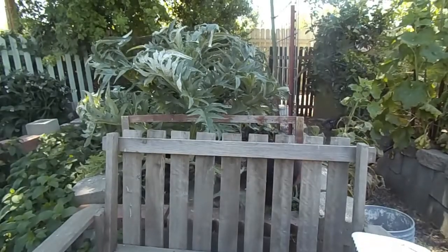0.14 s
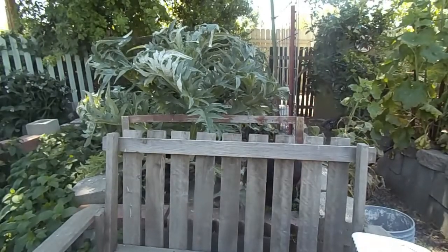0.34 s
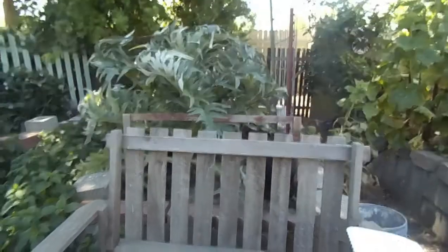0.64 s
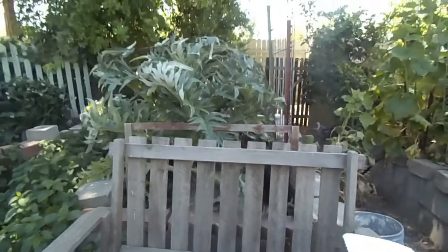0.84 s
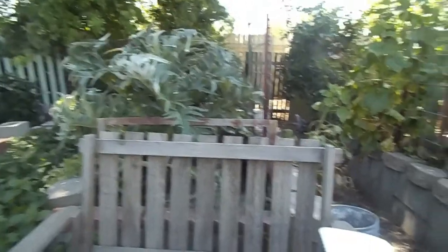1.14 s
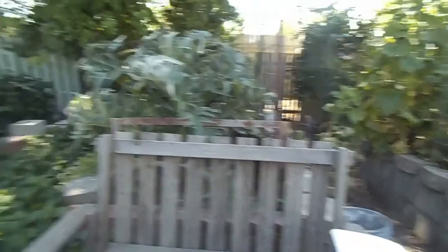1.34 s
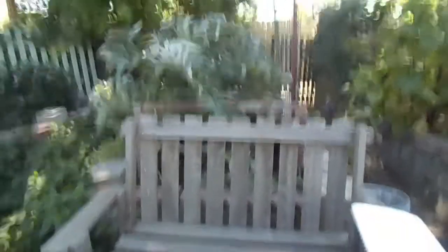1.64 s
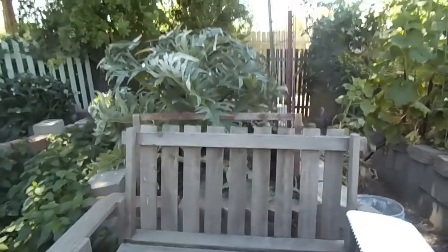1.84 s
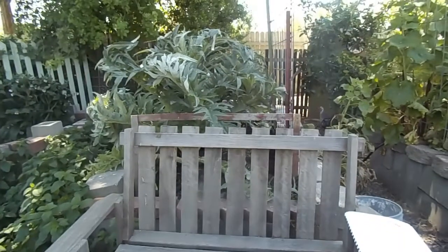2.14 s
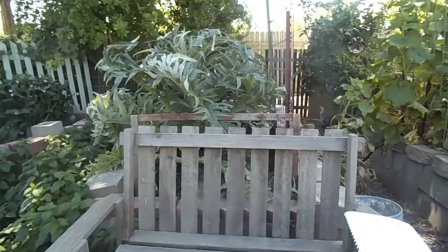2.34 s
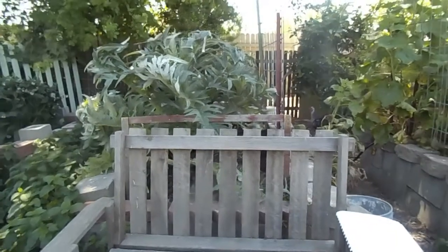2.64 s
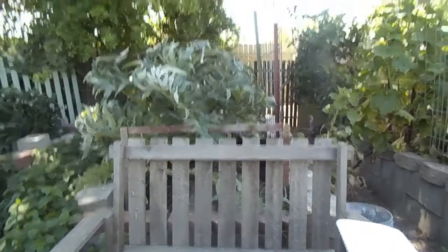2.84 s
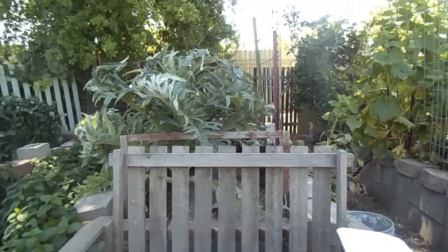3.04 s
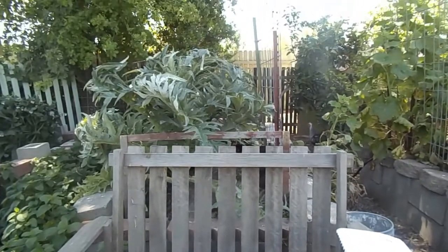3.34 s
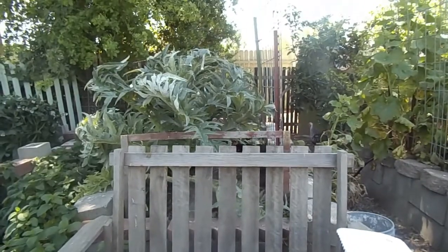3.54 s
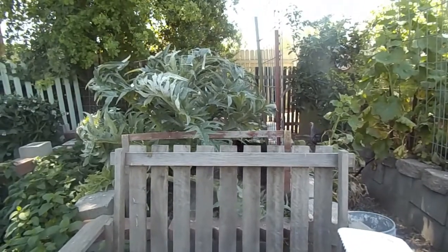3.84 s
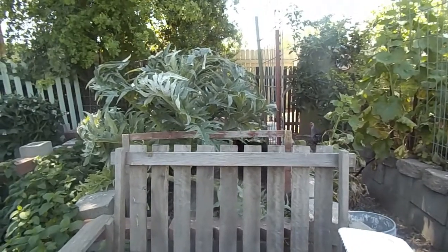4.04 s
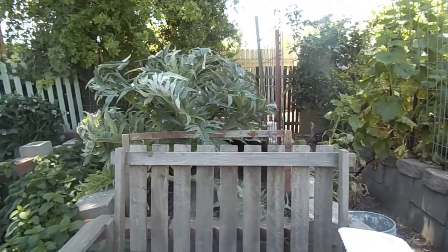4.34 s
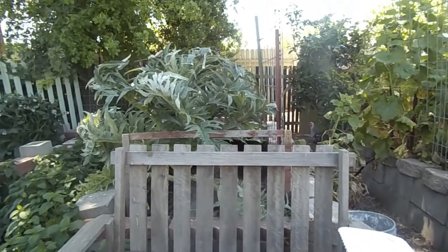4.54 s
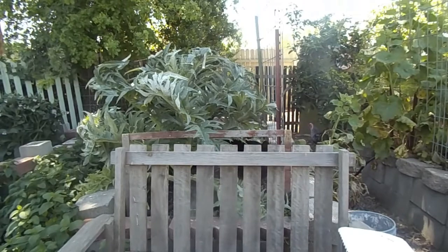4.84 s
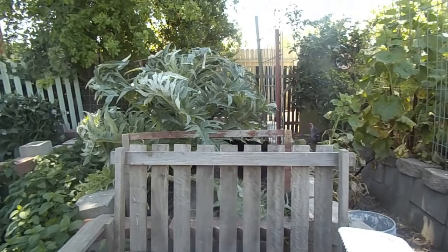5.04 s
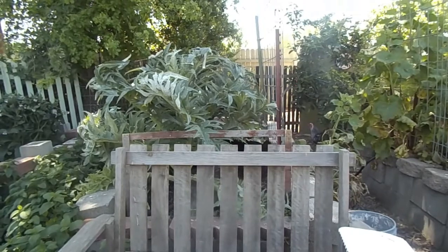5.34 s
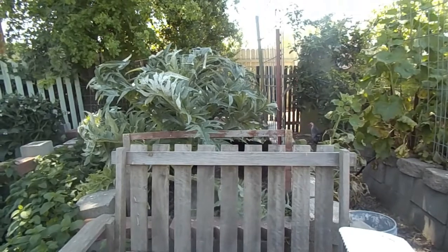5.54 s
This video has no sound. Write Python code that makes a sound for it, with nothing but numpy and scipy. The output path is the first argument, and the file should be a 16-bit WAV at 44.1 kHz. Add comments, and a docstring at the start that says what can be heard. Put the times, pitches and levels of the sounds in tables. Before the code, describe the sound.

A quiet fenced garden with a very faint, steady outdoor hush. A hen clucks softly at 0.0 s, then more firmly at 0.27, 0.5 and 0.75 s: short, slightly hoarse, arched notes. At 0.8 s she throws out a loud squawk, harsh and rough at first, breaking at 0.9 s into a clear held note that fades and drops by about 1.17 s. From 1.4 to 1.65 s the handheld plastic case clicks and creaks, with soft low bumps; more sparse clicks follow around 2.3-2.6 and 3.3-3.4 s. Weak, raspy clucks return at 2.0 and 2.45 s, then a stronger run about every 0.3 s from 2.75 to 4.5 s. A second squawk at 4.57 s starts rougher, cracks into a wavering clear note and drops by 4.93 s. A tiny scratchy bird chirp comes near 5.2 s, and a dull faint cluck at 5.6 s. Short fence echoes trail the calls.

```python
"""A soft hen cluck comes first, over a faint outdoor hush; arched clucks lead up to two long squawks.
Each squawk breaks from a harsh, period-doubled start into a clear held note that drops at the end.
The hen is a sum of membrane partials shaped by throat and beak; delayed copies and a noise tail are the yard.
A hand-held plastic case clicks (ringing modes) and bumps (damped low waves); small birds are gliding sines."""
import sys
import numpy as np
from scipy import signal
from scipy.fft import rfft, irfft
from scipy.io import wavfile

SR = 44100
rng = np.random.default_rng(int(sys.argv[2]) if len(sys.argv) > 2 else 0)


def store_pcm(level_fs):
    """Save levels as 16-bit WAV."""
    pcm = np.round(np.clip(level_fs, -1, 1) * 32767).astype(np.int16)
    wavfile.write(sys.argv[1], SR, np.atleast_2d(pcm).T)


N = 251370
TIME_S = np.arange(N) / SR
CUTOFF_HZ = 15900

# outdoor noise spectrum: (frequency [Hz], relative density [dB per Hz])
HUSH_SPECTRUM = [(18, -41), (30, -11), (75, -11), (295, -9), (486, 0), (822, -0.5), (889, 2), (1100, -2.5),
                 (2120, -9), (2350, -14), (2610, -11), (3220, -13), (5590, -16), (16000, -18.5)]
HUSH_RMS_DB = -55.5

# small birds: (start [s], length [s], first pitch [Hz], last pitch [Hz], peak before echoes [dB],
# waver [share of pitch])
BIRDS = [(.08, .28, 4620, 5400, -62, .022), (1.8, .2, 2560, 2660, -63, .025),
         (5.185, .055, 2500, 4700, -48, .13)]

# soft bumps of the hand: (time [s], pitch [Hz], level before gain and low-pass [dB])
BUMPS = [(.53, 140, -39), (.597, 130, -40.5), (0.779, 150, -42.5), (1.022, 179, -35), (1.549, 190, -30),
         (1.589, 200, -28), (1.87, 190, -38.5), (1.912, 168, -39.5), (3.275, 120, -40)]
# case clicks: (time [s], level of a 0 dB mode [dB], hardness [dB per octave], bright ring [dB])
CLICKS = [(0.157, -31.5, 1, 5), (0.41, -40.5, 5.5, -6), (1.4325, -36, -1.5, 6), (1.5283, -33, 0, 4),
          (1.5369, -27, -1, -6), (1.5488, -31, -1, 3), (1.5738, -27, 0, -5), (1.5884, -30, -1, -1),
          (1.6062, -26, -2, -3), (1.652, -34, -1, -7), (2.2954, -34, -1, 6), (2.389, -42, 8.5, -3),
          (2.5526, -25.5, 0, -2), (2.5734, -26, 3.5, -2), (2.6362, -29.5, -2, -4), (3.274, -35, -1, 7),
          (3.3988, -29, -1, 7), (3.4295, -38, 0, 4), (4.3658, -39.5, 1, -7), (5.116, -40, 0, -4)]
# plastic case modes: (frequency [Hz], level [dB], t60 [s])
CASE_MODES = [(340, -8, 0.015), (620, -6, 0.014), (860, -5, 0.014), (1224, 0, 0.017), (1573, -5.5, 0.029),
              (2220, -9, 0.013), (2880, -3.5, 0.014), (3460, -10, 0.018), (4960, -11, 0.0032),
              (6300, -11, 0.0023), (10030, -16, 0.0032), (14300, -14, 0.0013)]
# shifts of the grip: (start [s], length [s], mean creak level [dB], mean thud level [dB])
GRIP_SHIFTS = [(1.53, .11, -40, -45), (1.7, .07, -48, -60), (1.93, .33, -60, -52)]
SLIPS_PER_S = 60

# ground and near surfaces: (delay [s], level [dB])
NEAR_ECHOES = [(.0009, -24), (.0043, -15.5)]
# fences and walls: (delay [s], level before low-pass [dB])
FENCE_ECHOES = [(0.0128, -22), (0.03, -9), (.047, -17.5), (0.077, -23)]

# clucks: (top of the arch [s], pitch there [Hz], level before gain [dB], period doubling [0-1],
# beak resonance [dB], treble [dB])
CLUCKS = [(0.017, 576.5, -36, .4, -7, 3), (0.271, 573, -28, .1, -14, -2),
          (0.515, 555, -27.5, .17, -15.5, -2), (0.745, 592.2, -24.5, .13, -4.5, 7),
          (1.999, 633.6, -36.5, .95, -3, -8), (2.452, 596.6, -33, .85, 1.5, -1),
          (2.754, 562.7, -28.5, .45, 2, 3.5), (3.002, 572, -26.5, .42, 1.5, 5),
          (3.326, 565.6, -27.5, .17, 4, 2), (3.585, 570, -24.5, .03, 7, 1), (3.859, 568, -26.5, .3, 7, 2.5),
          (4.149, 548, -27.7, .4, 3, 2), (4.492, 544, -27, .45, 0, -1.5), (5.611, 580, -38.5, .45, -6, -11)]
# throat and beak in a cluck: (frequency [Hz], level [dB])
CLUCK_THROAT = [(280, -31.5), (560, -26), (850, -4), (1130, -1.5), (1420, -3), (1700, -17.5), (2250, -9.5),
                (2800, -20.5), (3600, -21.5), (4800, -33), (5900, -30), (7800, -39), (9800, -33),
                (13000, -49.5)]
# a louder cluck is longer
CLUCK_DB, CLUCK_HALF_S, LONGER_S_PER_DB = -28, .018, .0003

# squawks with their harsh starts: (start [s], pitch [Hz], pitch sag [Hz per s], level before gain [dB],
# period doubling [0-1], roughness [0-1], beak resonance [Hz], its fall in the held note [Hz per s])
SQUAWKS = [(.806, 753, 350, -18.5, .24, .33, 2960, 4300), (4.571, 724, 750, -20, .6, .2, 2480, 5800)]
# clear held note, one list per squawk: (time [s], pitch [Hz], level before gain [dB])
HELD_NOTES = [
    [(0.895, 676.8, -19), (0.909, 669.8, -19), (0.957, 666.4, -20), (1.115, 689.0, -25)],
    [(4.675, 688.7, -22), (4.703, 689.5, -19), (4.723, 662.7, -23), (4.745, 655.0, -26),
     (4.783, 677.6, -21), (4.865, 703.3, -24), (4.873, 705.3, -26)],
]
# throat and beak in a squawk: (frequency [Hz], level [dB])
SQUAWK_THROAT = [(350, -31), (680, -18), (1030, 2.5), (1400, 0), (1800, -9.5), (2200, -14), (3000, -18),
                 (3900, -17), (5000, -18), (6200, -12.5), (7700, -23), (9400, -17), (11500, -24),
                 (15500, -30)]
# scoop up from a slack membrane, break into the held note, drop back
SCOOP_S, BREAK_S, DROP_S = .03, .009, .056
SLACK_HZ, SLACK_DOUBLING, SLACK_ROUGH = 490, .8, .7
HELD_DOUBLING, HELD_ROUGH = .012, .025
ATTACK_DB, RELEASE_DB = 26, 15
# the beak is wide open at the break, then closes and lowers two resonances together
BEAK_OPEN_HZ, BEAK_SHUT_HZ, UPPER_RESONANCE_RATIO = 2780, 1850, 1.53


def from_db(db):
    """Decibels to gain."""
    return 10 ** (np.asarray(db) / 20)


def rms_one(x):
    """Scale to unit power."""
    return x / np.sqrt(np.mean(x ** 2) + 1e-20)


def blend(a, b, share):
    """From a at share 0 to b at share 1."""
    return a + (b - a) * share


def along(rows, t):
    """Each column of a curve at the times t."""
    s, *columns = np.transpose(rows)
    return [np.interp(t, s, c) for c in columns]


def at_hz(points, hz):
    """Gain of a spectrum, interpolated over log frequency."""
    f, db = np.transpose(points)
    return from_db(np.interp(np.log(hz + 1), np.log(f), db))


def resonance(hz, centre_hz, width_hz):
    """Bell of height 1 around a centre frequency."""
    return np.exp(-((hz - centre_hz) / width_hz) ** 2)


def lowpass(x, hz, order=2):
    """Butterworth low-pass."""
    return signal.sosfilt(signal.butter(order, min(hz, .45 * SR), fs=SR, output="sos"), x)


def wander(shape, hz):
    """Low-passed noise of unit power."""
    return rms_one(lowpass(rng.standard_normal(shape), hz))


def ring(clicks, hz, t60_s):
    """Two-pole resonator: a unit click starts a decaying wave of height 1."""
    radius = from_db(-60 / (t60_s * SR))
    w = 2 * np.pi * hz / SR
    return signal.lfilter([.5, 0, -.5], [1, -2 * radius * np.cos(w), radius * radius], clicks + 1e-18)


def reflect(x, echoes):
    """Sum of delayed, weakened copies."""
    return sum(from_db(db) * np.interp(TIME_S - delay_s, TIME_S, x, left=0) for delay_s, db in echoes)


def coloured(spectrum):
    """Steady noise of unit power with this spectrum."""
    gain = at_hz(spectrum, np.fft.rfftfreq(N, 1 / SR))
    return rms_one(irfft(rfft(rng.standard_normal(N)) * gain, N))


def hush():
    """Steady far-off outdoor noise."""
    return from_db(HUSH_RMS_DB) * coloured(HUSH_SPECTRUM)


def small_birds():
    """Thin whistles and a scratchy chirp: each glides up, swelling and fading."""
    out = np.zeros(N)
    for start_s, length_s, first_hz, last_hz, db, waver in BIRDS:
        u = np.clip((TIME_S - start_s) / length_s, 0, 1)
        pitch_hz = first_hz * (last_hz / first_hz) ** u
        phase = 2 * np.pi * np.cumsum(pitch_hz * (1 + waver * wander(N, 600))) / SR
        out += from_db(db) * np.sin(phase) * 2 * np.sqrt(u * (1 - u))
    return out


def slips(spread_db=3):
    """Small uneven finger slips while the grip shifts: (time [s], creak [dB], thud [dB])."""
    rows = []
    for start_s, length_s, creak_db, thud_db in GRIP_SHIFTS:
        chance = rng.uniform(-1, 1, (32, 3))
        count = int(length_s * SLIPS_PER_S) + 1
        for k, (late, creak, thud) in enumerate(chance[:count]):
            s = start_s + (k + late / 2) / SLIPS_PER_S
            rows.append((s, creak_db + spread_db * creak, thud_db + spread_db * thud))
    return rows


def hand_bumps(fingers, thud_hz=105, t60_cycles=3.0, soft_hz=330, gain_db=1.5):
    """Dull thuds of the hand: each dies within a few cycles."""
    out = np.zeros(N)
    for s, hz, db in list(BUMPS) + [(s, thud_hz, db) for s, _, db in fingers]:
        push = np.zeros(N)
        push[int(s * SR)] = from_db(db + gain_db)
        out += ring(push, hz, t60_cycles / hz)
    return lowpass(out, soft_hz)


def case_clicks(fingers, ring_hz=2880, ring_width_hz=900, rub_db=-12, rub_decay_s=0.0062, travel_cycles=2.5):
    """The plastic case slips under the fingers: a snap rings its modes, then rubbing dies away."""
    out = np.zeros(N)
    t = TIME_S[:SR // 20]
    for s, db, hardness, ring_db in list(CLICKS) + [(s, db, 0, 0) for s, db, _ in fingers]:
        for n, (hz, mode_db, t60_s) in enumerate(CASE_MODES):
            snap = ring(signal.unit_impulse(len(t)), hz, t60_s) * (-1) ** n
            rub = rms_one(ring(rng.standard_normal(len(t)), hz, t60_s / 2)) * np.exp(-t / rub_decay_s)
            colour_db = hardness * np.log2(hz / 1300) + ring_db * resonance(hz, ring_hz, ring_width_hz)
            # each mode arrives through the case at its own moment
            at = int((s + rng.random() * travel_cycles / (hz + 1000)) * SR)
            out[at:at + len(t)] += from_db(db + mode_db + colour_db) * (snap + from_db(rub_db) * rub)
    return out


def yard(x, scatter_db=-25.0206, low_t60_s=0.61, high_t60_s=0.34, split_hz=3500, echo_hz=4500):
    """Near surfaces colour the sound, fences return dull echoes, plants scatter a thin tail."""
    t = TIME_S[:SR]
    noise = rng.standard_normal(len(t)) * np.clip(t / 0.0072, 0, 1)
    low_tail = lowpass(noise, split_hz) * from_db(-60 * t / low_t60_s)
    tail = low_tail + 0.19 * noise * from_db(-60 * t / high_t60_s)
    tail *= from_db(scatter_db) / np.sqrt(np.sum(tail ** 2))
    near = reflect(x, NEAR_ECHOES)
    fences = lowpass(reflect(x, FENCE_ECHOES), echo_hz, order=1)
    return x + near + fences + signal.fftconvolve(x, tail)[:N]


def syrinx(pitch_hz, doubling, rough, throat, jitter, rasp, flutter_db):
    """Partials of the vibrating membrane: frequencies [Hz], strengths and unit-power waves."""
    multiple = np.arange(1, 57)[:, None] / 2
    uneven_hz = pitch_hz * (1 + jitter * rough * wander(len(pitch_hz), 315))
    phase = 2 * np.pi * np.cumsum(uneven_hz) / SR
    hz = multiple * pitch_hz
    # alternating strong and weak cycles put lines halfway between the harmonics
    strength = at_hz(throat, hz) * np.where(multiple % 1, doubling, 1) * (hz < CUTOFF_HZ)
    # upper partials swell and fade one by one
    strength = strength * from_db(flutter_db * np.clip(hz / 6000, 0, 1) * wander(hz.shape, 16.7))
    # turbulence shakes the high partials most
    shake = rasp * np.sqrt(np.abs(rough)) * np.minimum(hz / 4000, 2) ** 1.1
    # at the roughest moments the low ones tear too
    shake = shake + .45 * rough ** 2
    turn = multiple * phase + rng.uniform(0, 2 * np.pi, multiple.shape)
    in_phase = np.cos(turn) * (1 + shake * wander(hz.shape, 117))
    quadrature = np.sin(turn) * shake * wander(hz.shape, 107)
    return hz, strength, (in_phase + quadrature) / np.sqrt(.5 + shake ** 2)


def clucks(rise=.07, fall=0.0857, edge_rough=0.47, core_rough=0.06, hoarse=0.5, catch=0.48, gain_db=-0.94):
    """Pitch and loudness arch with the push of air; the voice catches an octave down, then clears."""
    out = np.zeros(N)
    for s, top_hz, db, doubling, beak_peak_db, treble_db in CLUCKS:
        half_s = CLUCK_HALF_S + LONGER_S_PER_DB * (db - CLUCK_DB)
        span = np.abs(TIME_S - s) < .06
        u = (TIME_S[span] - s) / half_s
        rising = u < 0
        slack = np.minimum(u ** 2, 3)
        rough = np.clip(core_rough + hoarse * doubling + edge_rough * slack, 0, 1)
        halves = np.clip(0.72 * doubling + slack * np.where(rising, catch, .12), 0, 1.3)
        arch_hz = top_hz * (1 - slack * np.where(rising, rise, fall))
        hz, strength, wave = syrinx(arch_hz, halves, rough, CLUCK_THROAT, jitter=0.026, rasp=1.0, flutter_db=2.5)
        beak_db = beak_peak_db * resonance(hz, 2100, 520)
        bright_db = treble_db * np.clip((hz - 2200) / 1500, 0, 1)
        # with little air the membrane closes softly: upper partials drop out first
        dull_db = slack * np.where(rising, 5.0, 3.2) * np.clip(np.log2(hz / 1300), 0, 1.4)
        gate = np.clip((u + 1.535) / 0.34, 0, 1) * np.clip((1.8 - u) / 0.69, 0, 1)
        push = from_db(db + gain_db - slack * np.where(rising, 6.5, 5.2)) * gate
        out[span] += push * np.sum(strength * from_db(beak_db + bright_db - dull_db) * wave, axis=0)
    return out


def squawks(gain_db=-0.9, beak_db=11.5, beak_width_hz=240, upper_db=13, upper_width_hz=330,
            thin_db=11, thin_from_hz=2400, thin_range_hz=500,
            harsh_dull_db=5, slack_dull_db=2, tire_db_per_s=14):
    """Long forced notes: scoop into a harsh start, break into a clear note as the beak closes, drop."""
    out = np.zeros(N)
    for squawk, note in zip(SQUAWKS, HELD_NOTES):
        start_s, top_hz, sag, harsh_db, harsh_doubling, harsh_rough, harsh_beak_hz, closing = squawk
        clear_s, drop_s = note[0][0], note[-1][0]
        span = (TIME_S > start_s) & (TIME_S < drop_s + DROP_S)
        t = TIME_S[span]

        scoop = np.clip(1 - (t - start_s) / SCOOP_S, 0, 1)
        harsh = np.clip((clear_s - t) / BREAK_S, 0, 1)
        release = np.clip((t - drop_s) / DROP_S, 0, 1)
        slack = scoop + release
        held_s = np.maximum(t - clear_s, 0)

        held_hz, held_db = along(note, t)
        harsh_hz = top_hz - sag * (t - start_s - SCOOP_S)
        pitch_hz = blend(blend(held_hz, harsh_hz, harsh), SLACK_HZ, slack)
        doubling = blend(blend(HELD_DOUBLING, harsh_doubling, harsh), SLACK_DOUBLING, slack)
        rough = blend(blend(HELD_ROUGH, harsh_rough, harsh), SLACK_ROUGH, np.sqrt(slack))
        level_db = blend(held_db, harsh_db, harsh) - ATTACK_DB * scoop ** 2 - RELEASE_DB * release ** 2
        closing_beak_hz = np.maximum(BEAK_OPEN_HZ - closing * held_s, BEAK_SHUT_HZ)
        beak_hz = blend(closing_beak_hz, harsh_beak_hz, harsh)

        hz, strength, wave = syrinx(pitch_hz, doubling, rough, SQUAWK_THROAT, jitter=0.018, rasp=1.15, flutter_db=3.5)
        lift_db = beak_db * resonance(hz, beak_hz, beak_width_hz)
        # the upper resonance speaks once the beak has begun to close
        upper = resonance(hz, beak_hz * UPPER_RESONANCE_RATIO, upper_width_hz)
        lift_db = lift_db + upper_db * np.clip(held_s / .09, 0, 1) * upper
        # treble is strongest at the break and fades as the air runs out
        treble_loss_db = harsh_dull_db * harsh + slack_dull_db * slack + tire_db_per_s * held_s
        dull_db = treble_loss_db * np.clip((hz - 2800) / 2000, 0, 1)
        # a wide open beak holds back the lowest partials
        gape = np.clip((beak_hz - thin_from_hz) / thin_range_hz, 0, 1)
        low_loss_db = thin_db * gape * np.clip((1350 - hz) / 250, 0, 1)
        strength = strength * from_db(lift_db * (1 - np.sqrt(release)) - dull_db - low_loss_db)

        voice = np.sum(strength * wave, axis=0) / np.sqrt(np.sum(strength ** 2, axis=0))
        out[span] += signal.windows.tukey(len(t), .04) * from_db(level_db + gain_db) * voice
    return out


def scene():
    """Hen and birds sound in the yard; handling noise and hush get no echoes."""
    outdoors = yard(clucks() + squawks() + small_birds()) + hush()
    fingers = slips()
    return (outdoors + case_clicks(fingers) + hand_bumps(fingers))[None]


def record(dry):
    """Steep elliptic low-pass at CUTOFF_HZ."""
    return signal.sosfilt(signal.ellip(10, .2, 80, CUTOFF_HZ, fs=SR, output="sos"), dry)


dry = scene()
out = record(dry)
store_pcm(out)
```